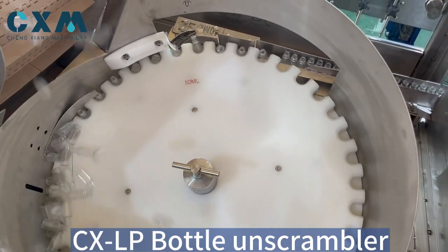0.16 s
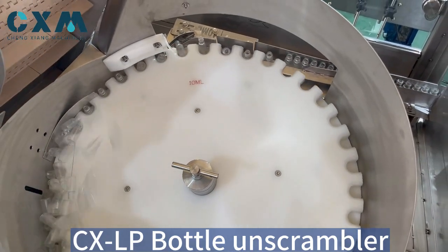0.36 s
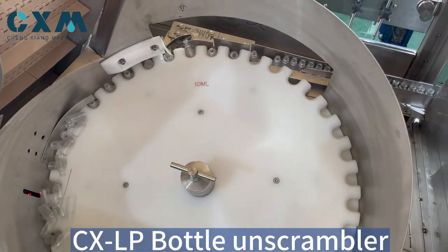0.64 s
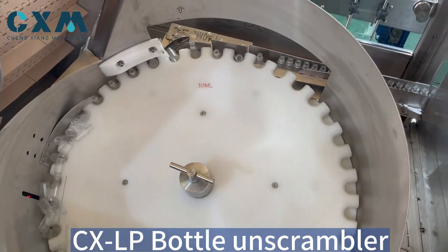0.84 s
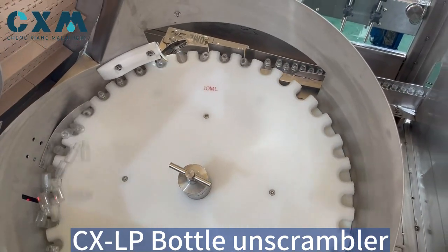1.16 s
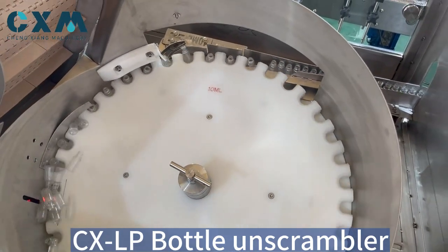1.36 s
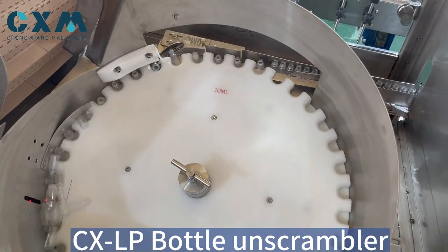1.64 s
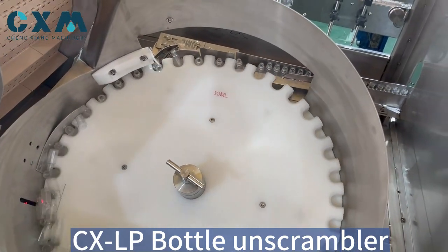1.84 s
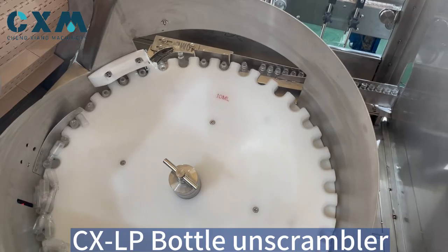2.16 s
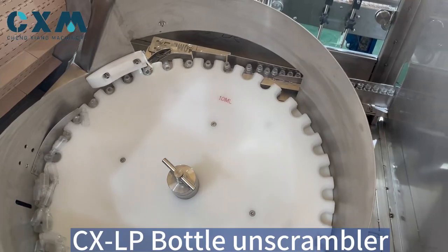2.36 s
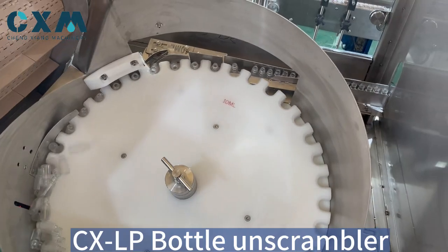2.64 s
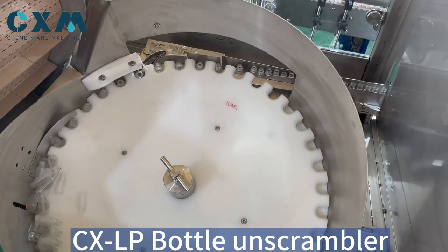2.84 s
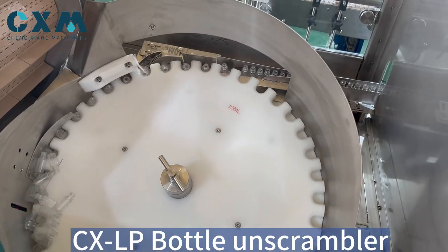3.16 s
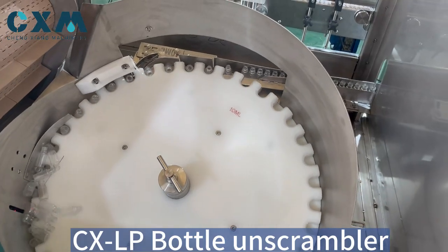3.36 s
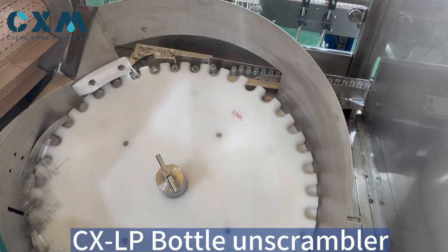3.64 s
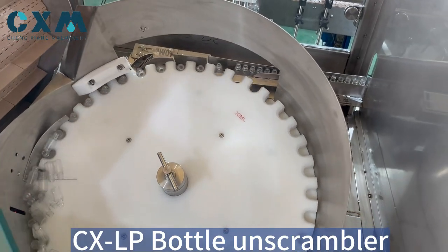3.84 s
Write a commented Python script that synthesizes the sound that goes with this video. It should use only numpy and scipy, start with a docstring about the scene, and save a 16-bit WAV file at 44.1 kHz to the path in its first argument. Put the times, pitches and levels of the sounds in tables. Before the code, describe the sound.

Small hard plastic bottles clatter brightly into a rotating feeder bowl, then thin to sparse rattles.

```python
"""A bright clatter of small hard bottles pours into a turning feeder bowl, then settles to a jostle at its rim.
Countless random knocks sound decaying bottle modes; denser bursts make the tumbles, single rings the clacks.
A motor hums faintly over a low rumble, and sparse decaying echoes make the hard workshop.
A phone's two microphone ports colour the sum and the difference of the channels differently."""
import sys
import numpy as np
from scipy import signal
from scipy.fft import rfft, irfft, next_fast_len
from scipy.io import wavfile
from scipy.ndimage import uniform_filter1d

SR = 44100
rng = np.random.default_rng(int(sys.argv[2]) if len(sys.argv) > 2 else 0)


def invert_db(x):
    """Field ratio 10**(x/20) for x, a level in decibels (scalar or array-like)."""
    u = np.asarray(x, float) / 20
    return 10 ** u


def output_pcm(signal):
    """Save a mono or channel-first signal as 16-bit PCM at the path in sys.argv[1].

    Samples are clipped to [-1, 1] before scaling.
    """
    pcm = np.clip(np.atleast_2d(signal).T, -1, 1) * 32767
    wavfile.write(sys.argv[1], SR, np.round(pcm).astype(np.int16))


N = 176400  # 4 s

# Modes of one bottle. Each row: frequency in Hz, level in dB, t60 in seconds.
BOTTLE_MODES = [(537, 0.5, 0.1), (972, -2.5, 0.02), (1167, -15, 0.037), (1451, -1.5, 0.057),
                (1817, 4, 0.045), (2050, -7, 0.088), (2290, -3, 0.037), (2600, -2.5, 0.11),
                (2920, 2, 0.092), (3385, 3.5, 0.052), (3685, 4.5, 0.048), (4350, 7, 0.021),
                (4550, -6, 0.092), (4934, 11, 0.055)]
MODE_DETUNE, MODE_SPREAD_DB = 0.015, 7  # standard deviations: share of the frequency, level
TICK_DB, TICK_T60_S = 25, 0.031

# Steady jostle of the heap. Each row: time in seconds, level in dB, tilt in dB (up in treble, down in bass).
JOSTLE_COURSE = [(0.0, -15.5, 0.5), (0.07, -36, 8.5), (0.22, -26.5, -0.5), (0.38, -23, 2),
                 (0.67, -27.5, 1.5), (1.06, -36, -2), (1.6, -43.5, -0.5), (1.99, -52, -5.5),
                 (2.26, -52.5, -3), (2.42, -62, -2), (2.6, -48.5, 0.5), (2.83, -52, -2.5),
                 (3.13, -46, -1.5), (3.33, -42.5, -2), (3.56, -56, -4), (3.69, -40.5, -3),
                 (3.87, -45.5, -2.5), (4.0, -58, 2.5)]
JOSTLE_PER_S, SIZE_SPREAD_DB = 800, 3.6
CLUMP_S, CLUMP_DEPTH_DB = .03, 2.4

# Motor hum. Each row: time in seconds, level in dB.
HUM_COURSE = [(0.0, -44.5), (0.23, -42.5), (0.27, -53), (0.3, -31), (0.33, -49.5), (0.51, -41), (0.71, -62),
              (0.73, -47), (0.87, -59), (1.47, -52), (1.541, -68), (1.84, -46), (1.87, -61), (1.92, -53),
              (2.17, -64), (2.21, -44), (2.29, -41), (2.37, -54.5), (2.47, -50), (2.52, -62), (2.6, -52),
              (2.65, -52), (2.73, -60), (2.81, -47.5), (3.14, -56), (4.0, -56)]
HUM_HZ, HUM_WAVER_HZ, HUM_STEADY_SHARE = 99.5, 14, .7
# Spectrum of the machine's rumble in the sum. Each row: frequency in Hz, relative level in dB per Hz.
RUMBLE_SUM = [(12, -42.5), (20, 3), (105, -10.5), (160, -11.5), (302, -8), (337, -17.5), (398, -8.5),
              (457, -11.5), (2280, -29.5), (13800, -45.5), (15000, -60)]
# Spectrum of the rumble in the difference. Each row: frequency in Hz, relative level in dB per Hz.
RUMBLE_DIFFERENCE = [(12, -38), (20, -4.5), (86, -16), (204, -5), (228, -16), (328, 3), (1480, -2.5),
                     (1860, -18), (16000, -24)]
RUMBLE_SUM_DB, RUMBLE_DIFFERENCE_DB = -47, -50

# Tumbles, each a burst of knocks. Each row: start in seconds, level in dB ahead of the common trim,
# low ring in Hz, high ring in Hz, treble rise in seconds, t60 in seconds, tilt in dB (up in treble, down in bass).
TUMBLE_BURSTS = [(0.014, -7, 980, 4720, 0.0035, 0.055, -4.5), (0.082, -5.5, 2370, 3800, 0.003, 0.19, -1),
                 (0.111, -3, 2520, 5900, 0.0034, 0.19, 0), (0.139, -9.5, 2800, 3860, 0.0049, 0.18, 10),
                 (0.199, 0.5, 2110, 4600, 0.0011, 0.12, 8), (0.254, -5, 3010, 4400, 0.002, 0.087, -19),
                 (0.285, -7.5, 1000, 3960, 0.0038, 0.19, 3), (0.318, -1, 2290, 4500, 0.011, 0.069, -4),
                 (0.399, -3.5, 1000, 4650, 0.0019, 0.15, 15), (0.421, -2, 1860, 3860, 0.0018, 0.048, 12),
                 (0.449, -4.5, 2150, 4200, 0.0027, 0.052, 14), (0.5, -8, 2600, 4300, 0.004, 0.69, -0.5),
                 (0.543, -2, 2140, 5070, 0.0061, 0.094, -6), (0.6, -3.5, 2360, 3520, 0.0098, 0.035, -1.5),
                 (0.718, -5.5, 2000, 3950, 0.00075, 0.22, 1.5),
                 (0.738, -7.5, 2200, 3050, 0.0054, 0.16, -4.5), (0.809, -14.5, 2300, 3720, 0.0059, 0.59, 8),
                 (0.951, -14, 2100, 4020, 0.0058, 0.11, -3), (0.974, -17.5, 2130, 3000, 0.022, 0.46, 1),
                 (1.197, -24.5, 2050, 3790, 0.0073, 0.38, -20), (1.28, -20.5, 960, 4200, 0.0018, 0.16, -1),
                 (1.34, -22.5, 2180, 4270, 0.0045, 0.12, -6), (1.418, -27.5, 1980, 3450, 0.0037, 0.56, -4),
                 (1.489, -24, 2170, 4350, 0.0015, 0.18, -0.5), (1.569, -23.5, 1050, 4350, 0.0019, 0.1, 2),
                 (1.677, -27.5, 820, 3950, 0.0031, 0.21, -0.5),
                 (1.754, -26.5, 2200, 4600, 0.0054, 0.61, 22),
                 (1.829, -24.5, 880, 4100, 0.0025, 0.29, -1.5), (1.869, -24, 960, 4730, 0.0058, 0.19, 2),
                 (2.011, -32, 1910, 5300, 0.0069, 0.74, 14), (2.058, -16, 2130, 4900, 0.0034, 0.14, -3),
                 (2.52, -34, 1060, 4900, 0.0052, 0.17, -5), (2.582, -34, 990, 3620, 0.0035, 0.21, -1.5),
                 (2.652, -26, 960, 3600, 0.005, 0.34, -0.5), (2.699, -26.5, 1270, 3700, 0.0026, 0.078, 0),
                 (2.74, -26.5, 986, 4600, 0.0019, 0.2, 0.5), (2.87, -24.5, 2140, 3550, 0.0043, 0.11, -2),
                 (2.929, -27.5, 969, 3940, 0.0046, 0.065, -17), (2.979, -13.5, 830, 3950, 0.017, 0.085, 3),
                 (3.008, -15.5, 2280, 4350, 0.0022, 0.13, -1), (3.039, -22, 2210, 3330, 0.0033, 0.089, 14),
                 (3.138, -25.5, 1030, 3780, 0.0012, 0.12, 1.5), (3.267, -22.5, 685, 4420, 0.0016, 0.15, -2),
                 (3.481, -28.5, 1040, 3700, 0.005, 0.17, -1.5), (3.519, -15, 2270, 3900, 0.003, 0.14, -2.5),
                 (3.549, -23, 2190, 3980, 0.005, 0.77, 1), (3.593, -18.5, 970, 4400, 0.0025, 0.13, -1),
                 (3.68, -24, 1430, 3770, 0.0032, 0.13, -0.5), (3.798, -35, 2200, 4380, 0.0032, 0.12, 15),
                 (3.948, -30, 2080, 4970, 0.003, 0.082, -1)]
TUMBLE_PER_S, TUMBLE_TRIM_DB = 2500, -14
LOW_RISE_TIMES, FADE_POWER = 3, 1.4  # bass rise against treble rise; above 1 the fade speeds up
LOW_RING_WIDTH_HZ, HIGH_RING_WIDTH_HZ = 160, 320
LOW_RING_DB, HIGH_RING_DB = -4.5, -5  # for a tumble of 0 dB
RING_PER_DB, HIGH_RING_T60_S = .17, .3  # harder tumbles ring more; the high ring gets a fade of its own

# Single sharp clacks of one bottle on another. Each row: start in seconds, level in dB, ring in Hz,
# ring t60 in seconds.
CLACK_HITS = [(0.0159, -8.5, 4830, 0.026), (0.113, -10, 2560, 0.066), (0.126, -14, 2235, 0.1),
              (0.150, -11, 2274, 0.034), (0.166, -22, 2220, .04), (0.181, -12.5, 2160, .03),
              (0.199, -7.5, 4350, 0.018), (0.200, -12, 4960, 0.038), (0.201, -12, 2120, 0.031),
              (0.207, -17, 4350, 0.025), (0.225, -19, 2940, .2), (0.2537, -19, 1734, 0.072),
              (0.291, -13, 4570, 0.043), (0.305, -14, 4320, 0.075), (0.3214, -12, 2296, 0.065),
              (0.324, -13, 2990, 0.068), (0.338, -5, 2207, 0.019), (0.351, -13, 2245, 0.076),
              (0.391, -13.5, 3800, 0.046), (0.404, -22, 4440, .03), (0.410, -14, 5000, 0.068),
              (0.4178, -20, 1930, 0.043), (0.428, -15.5, 3840, 0.075), (0.44, -6, 4390, 0.021),
              (0.452, -16, 4390, 0.024), (0.456, -17.5, 2217, 0.046), (0.501, -17, 2600, .03),
              (0.5532, -13.5, 4550, 0.044), (0.557, -19.5, 4910, 0.11), (0.5985, -12.5, 2300, 0.03),
              (0.607, -24, 2600, 0.074), (0.7374, -8, 2252, 0.031), (0.755, -9, 2230, 0.035),
              (0.725, -19, 4370, 0.021), (0.820, -14.5, 2290, 0.038), (0.910, -22, 2140, 0.029),
              (0.953, -32, 4950, .03), (0.984, -25, 2296, 0.069), (1.062, -26, 2266, 0.041),
              (1.174, -25.5, 2190, .05), (1.678, -38.5, 820, 0.058), (1.722, -38.5, 784, 0.057),
              (1.874, -37, 4450, .03), (1.505, -40, 4350, .03), (1.5718, -31, 4320, .03),
              (1.7534, -43, 4900, .015), (2.0602, -45, 2060, 0.047), (2.478, -48, 1460, .09),
              (2.618, -40.5, 2110, 0.061), (2.6527, -31.5, 4370, 0.025), (2.693, -33.5, 4980, 0.025),
              (2.7392, -28, 4280, .015), (2.8699, -37, 4400, 0.015), (2.875, -40, 2150, .04),
              (2.951, -36, 1760, 0.066), (2.986, -29, 4540, 0.018), (2.996, -30, 4500, 0.034),
              (3.008, -33, 2380, 0.073), (3.033, -32, 2160, .05), (3.055, -31, 2110, 0.023),
              (3.1408, -31.5, 3960, 0.033), (3.481, -33, 3730, 0.018), (3.5213, -27.5, 2185, 0.056),
              (3.552, -27, 2290, 0.047), (3.5927, -22, 4270, 0.027), (3.716, -38, 2250, 0.028)]
CLACK_RISE_S, CLACK_KNOCK_DB, CLACK_TILT_DB = .002, -7.5, -3
TWIN_SHARE, TWIN_DETUNE = .45, .035  # amplitude of the beating twin, its largest share of detuning

# Decay of the workshop. Each row: frequency in Hz, t60 in seconds.
ROOM_DECAY = [(200, 0.37), (1000, 0.52), (3000, 0.36), (6000, 0.079), (12000, 0.1)]
ROOM_HALF_TURNS_PER_S = 7
ROOM_SUM_DB, ROOM_DIFFERENCE_DB = -5, -10

# Colour of the knocks in the sum of the ports. Each row: frequency in Hz, gain in dB.
SUM_COLOUR = [(35, -47), (60, -5.5), (102, -23), (150, -19), (266, -6.5), (471, -15), (529, -9.5),
              (745, -10), (937, -4), (1550, -4), (2190, -4), (3300, -8), (4450, -6.5), (5050, -14.5),
              (5500, -14), (7190, -18), (8250, -17.5), (9910, -16), (14300, -24.5)]
# Colour of the knocks in the difference, ahead of its trim. Each row: frequency in Hz, gain in dB.
DIFFERENCE_COLOUR = [(59, -83.5), (100, -51.5), (344, -15), (1490, 3), (1730, -6.5), (2600, -7),
                     (6350, -11), (9310, -7), (12000, -21), (13700, -20.5), (16200, -5)]
DIFFERENCE_TRIM_DB, DIFFERENCE_DIRECT_DB = 6, -11
# Top treble of the knocks, above 8 kHz. Each row: time in seconds, gain in dB.
TOP_COURSE = [(0, 3), (.1, 0), (.19, -1), (.3, 1.5), (.6, -0.5), (.8, 0), (1.101, -5), (1.5, 0.5),
              (1.9, -4), (2.07, -1.5), (2.3, 1.5), (2.6, -1), (2.72, 6), (2.85, -3), (2.99, 7),
              (3.05, -3.5), (3.14, 5.5), (3.3, -2), (3.5, 2.5), (3.7, -3), (4, 2)]
# Band edges of the sum. Each row: frequency in Hz, gain in dB.
SUM_EDGES = [(20, -29.5), (60, -0.5), (14200, -0.5), (14700, -26), (16000, -40), (16400, -60)]
# Upper band edge of the difference. Each row: frequency in Hz, gain in dB.
DIFFERENCE_EDGE = [(15700, -3.5), (16000, -15), (16400, -59.5)]
# Where the ports cancel: centre in Hz, width in Hz, gain in dB.
SUM_NULL, DIFFERENCE_NULL = (8300, 1150, -45), (12100, 1500, -30)


def evened(x):
    """Scales to rms 1."""
    return x / np.sqrt(np.mean(x ** 2) + 1e-20)


def read(points, hz):
    """Reads a table on a log-frequency axis."""
    f, value = np.transpose(points)
    return np.interp(np.log(hz + 1), np.log(f + 1), value)


def add(mix, s, sound):
    """Mixes a sound in at time s."""
    part = mix[round(s * SR):][:len(sound)]
    part += sound[:len(part)]


def coloured(x, points, null=(1, 1, 0), turn=1):
    """Filters by a spectrum table and one flat-bottomed null; turn is a phase factor."""
    size = next_fast_len(len(x) + 4096)
    hz = np.fft.rfftfreq(size, 1 / SR)
    centre, width, depth_db = null
    db = read(points, hz) + depth_db * np.exp(-((hz - centre) / width * 2) ** 4)
    return irfft(rfft(x, size) * invert_db(db) * turn, size)[:len(x)]


def tilted(x, db, low_gain=1, high_gain=1):
    """Raises what lies above 3.3 kHz by db and lowers what lies below by as much."""
    low = signal.sosfilt(signal.butter(2, 3300, fs=SR, output="sos"), x)
    high = x - low
    return low * invert_db(-db) * low_gain + high * invert_db(db) * high_gain


def knock_shapes(count=36):
    """A noise tick plus the bottle's modes, detuned and weighed anew for each bottle and place of contact."""
    t = np.arange(4096) / SR
    hz, db, t60 = np.transpose(BOTTLE_MODES)[:, None, :, None]
    weight, detune = rng.standard_normal((2, count, len(BOTTLE_MODES), 1))
    level_db = db + MODE_SPREAD_DB * np.clip(weight, -2, 1) - 60 * t / t60
    rings = invert_db(level_db) * np.sin(2 * np.pi * hz * (1 + MODE_DETUNE * detune) * t)
    tick = invert_db(TICK_DB - 60 * t / TICK_T60_S) * rng.standard_normal((count, len(t)))
    return rings.sum(1) + tick


def knocks(per_s, shapes):
    """A random stream of knocks of uneven size, each with one of the shapes."""
    size_db = SIZE_SPREAD_DB * np.minimum(rng.exponential(1, N), 4)
    size = invert_db(size_db) * (rng.random(N) < per_s / SR)
    which = rng.integers(0, len(shapes), N)
    return size, which


def sounded(size, which, shapes):
    """Each knock plays its shape."""
    return sum(signal.oaconvolve(size * (which == k), shape)[:N] for k, shape in enumerate(shapes))


def jostle(shapes):
    """The heap of bottles rubs and knocks in clumps: smoothed noise makes the knocks harder and softer."""
    t = np.arange(N) / SR
    s, db, tilt = np.transpose(JOSTLE_COURSE)
    size, which = knocks(JOSTLE_PER_S, shapes)
    width = round(CLUMP_S * SR)
    clumps = evened(uniform_filter1d(uniform_filter1d(rng.standard_normal(N), width), width))
    clumped = size * invert_db(CLUMP_DEPTH_DB * clumps)
    stream = evened(coloured(sounded(clumped, which, shapes), SUM_COLOUR))
    return tilted(stream, np.interp(t, s, tilt)) * invert_db(np.interp(t, s, db))


def motor():
    """A hum wavering in level and phase over the machine's wide noise rumble: sum and difference."""
    t = np.arange(N) / SR
    s, db = np.transpose(HUM_COURSE)
    slow = signal.butter(2, HUM_WAVER_HZ, fs=SR, output="sos")
    waver = signal.sosfilt(slow, rng.standard_normal((2, N)))
    wandering = evened(waver[0]) + 1j * evened(waver[1])
    swing = HUM_STEADY_SHARE + (1 - HUM_STEADY_SHARE) * wandering
    hum = evened((swing * np.exp(2j * np.pi * HUM_HZ * t)).real) * invert_db(np.interp(t, s, db))
    sum_noise, difference_noise = rng.standard_normal((2, N))
    rumble = invert_db(RUMBLE_SUM_DB) * evened(coloured(sum_noise, RUMBLE_SUM))
    difference = invert_db(RUMBLE_DIFFERENCE_DB) * evened(coloured(difference_noise, RUMBLE_DIFFERENCE))
    return hum + rumble, difference


def ringing(x, hz, width_hz):
    """One ring picked out of a stream of knocks by a two-pole resonator, rms 1."""
    r = np.exp(-np.pi * width_hz / SR)
    return evened(signal.lfilter([1, 0, -1], [1, -2 * r * np.cos(2 * np.pi * hz / SR), r * r], x))


def tumbles(shapes):
    """Bursts of dense knocks that swell, treble first, and fade; a low and a high ring stand out in each."""
    stream = evened(coloured(sounded(*knocks(TUMBLE_PER_S, shapes), shapes), SUM_COLOUR))
    out = np.zeros(N)
    t = np.arange(SR // 3) / SR
    excerpts = rng.integers(0, N - len(t), len(TUMBLE_BURSTS))
    for (s, db, low_hz, high_hz, rise, t60, tilt), at in zip(TUMBLE_BURSTS, excerpts):
        part = stream[at:at + len(t)]
        low_gain = invert_db(LOW_RING_DB + RING_PER_DB * db)
        high_gain = invert_db(HIGH_RING_DB + RING_PER_DB * db - 60 * t / HIGH_RING_T60_S)
        low_ring = low_gain * ringing(part, low_hz, LOW_RING_WIDTH_HZ)
        high_ring = high_gain * ringing(part, high_hz, HIGH_RING_WIDTH_HZ)
        low_rise = np.minimum(t / (LOW_RISE_TIMES * rise), 1)
        high_rise = np.minimum(t / rise, 1)
        fade = invert_db(-60 * (t / t60) ** FADE_POWER)
        burst = fade * tilted(part + low_ring + high_ring, tilt, low_rise, high_rise)
        # each burst gets the energy of its fade, whatever its tilt and rings
        burst *= np.linalg.norm(fade) / np.linalg.norm(burst)
        add(out, s, invert_db(db + TUMBLE_TRIM_DB) * burst)
    return out


def clacks(shapes):
    """One dry knock each, with the ring of the mode that it strikes most and a close twin that beats with it."""
    out = np.zeros(N)
    t = np.arange(shapes.shape[1]) / SR
    for (s, db, hz, t60), (pick, gap) in zip(CLACK_HITS, rng.random((len(CLACK_HITS), 2))):
        shape = shapes[int(pick * len(shapes))]
        # the pad keeps the filter's early ripple from wrapping round
        knock = tilted(coloured(np.pad(shape, (64, 0)), SUM_COLOUR), CLACK_TILT_DB)[64:]
        knock = invert_db(CLACK_KNOCK_DB) * knock / abs(knock).max()
        twin_hz = hz * (1 + TWIN_DETUNE * (2 * gap - 1))
        pair = np.sin(2 * np.pi * hz * t) + TWIN_SHARE * np.sin(2 * np.pi * twin_hz * t)
        ring = invert_db(-60 * t / t60) * pair
        add(out, s, np.minimum(t / CLACK_RISE_S, 1) * invert_db(db) * (knock + ring))
    return out


def room(x):
    """Tails of sparse taps, each band dying at its own speed; the moving heap feeds three paths in turn."""
    taps = np.zeros((6, SR))  # three paths for the sum, three for the difference
    at = np.arange(100, SR - 20, 20) + rng.integers(0, 20, (6, (SR - 101) // 20))
    np.put_along_axis(taps, at, rng.choice([-1., 1.], at.shape), 1)
    hz, t, z = signal.stft(taps, SR, nperseg=256)
    decay = invert_db(-60 * t / read(ROOM_DECAY, hz)[:, None])
    tail = signal.istft(z * decay, SR, nperseg=256)[1][:, :SR // 2]
    turn = np.pi * (ROOM_HALF_TURNS_PER_S * np.arange(N) / SR + np.arange(6)[:, None] / 3)
    feed = x * np.cos(turn) * np.sqrt(2 / 3)
    wet = signal.fftconvolve(feed, tail / np.linalg.norm(tail[0]), axes=1)[:, :N]
    return wet[:3].sum(0), wet[3:].sum(0)


def top_treble(bottles):
    """The treble above 8 kHz flickers in level."""
    low = signal.sosfiltfilt(signal.butter(4, 8000, fs=SR, output="sos"), bottles)
    s, db = np.transpose(TOP_COURSE)
    return low + (bottles - low) * invert_db(np.interp(np.arange(N) / SR, s, db))


def ports(mid, side, hum_mid, hum_side):
    """The two ports colour sum and difference, each with a null; the bottles' difference lies a quarter turn off."""
    # the knocks already carry the colour of the sum, so the difference takes only what sets it apart
    ratio = [(hz, read(DIFFERENCE_COLOUR, hz) - read(SUM_COLOUR, hz) + DIFFERENCE_TRIM_DB)
             for hz in np.geomspace(30, 14000, 200)]
    mid = coloured(mid + hum_mid, SUM_EDGES, SUM_NULL)
    side = coloured(coloured(side, ratio, turn=1j) + hum_side, DIFFERENCE_EDGE, DIFFERENCE_NULL)
    return mid, side


def scene():
    """Bottles, room and motor as sum and difference, then left and right."""
    shapes = knock_shapes()
    bottles = top_treble(jostle(shapes) + tumbles(shapes) + clacks(shapes))
    room_mid, room_side = room(bottles)
    mid = bottles + invert_db(ROOM_SUM_DB) * room_mid
    side = invert_db(DIFFERENCE_DIRECT_DB) * mid + invert_db(ROOM_DIFFERENCE_DB) * room_side
    mid, side = ports(mid, side, *motor())
    return np.array([mid + side, mid - side])


def low_pass(x):
    """Removes everything above the highest recorded frequency."""
    return signal.sosfilt(signal.butter(12, 16450, fs=SR, output="sos"), x)


def record(dry):
    """Hands on the finished mix."""
    return low_pass(dry)


dry = scene()
out = record(dry)
output_pcm(out)
```